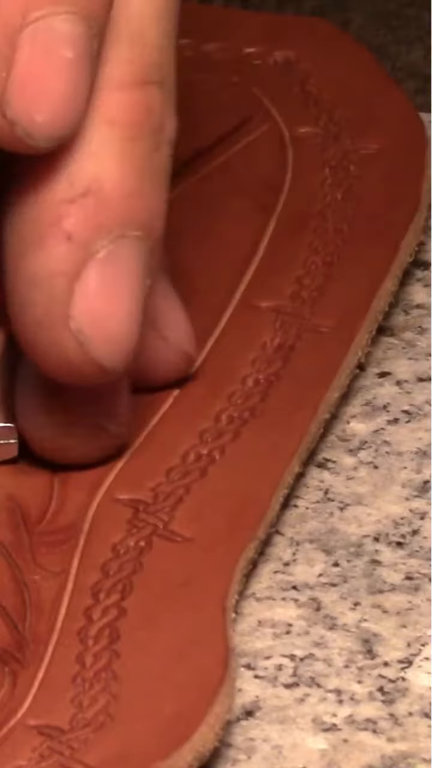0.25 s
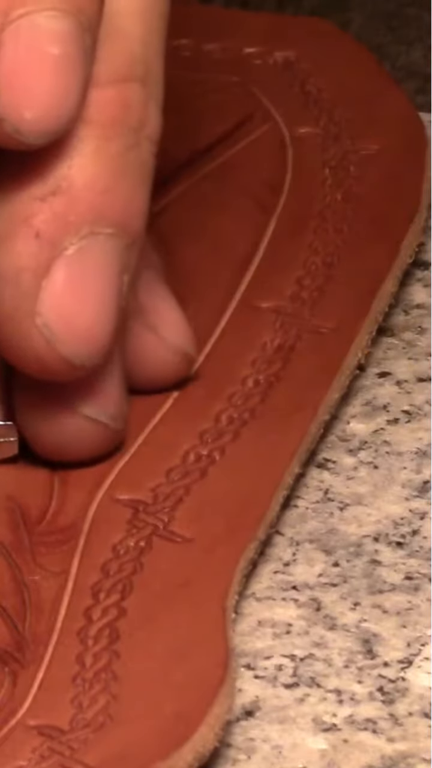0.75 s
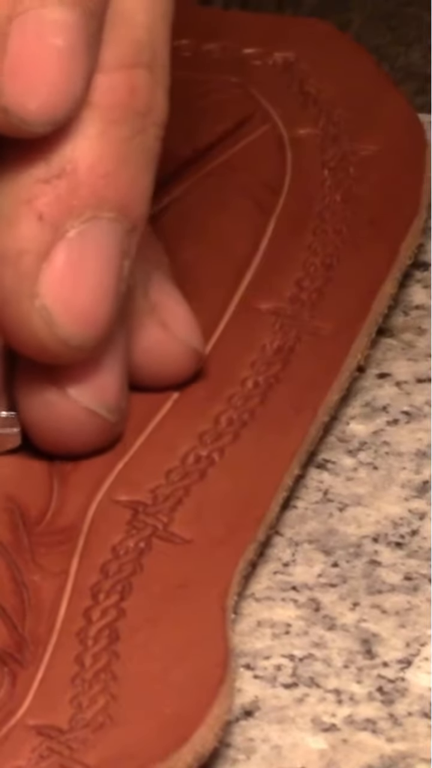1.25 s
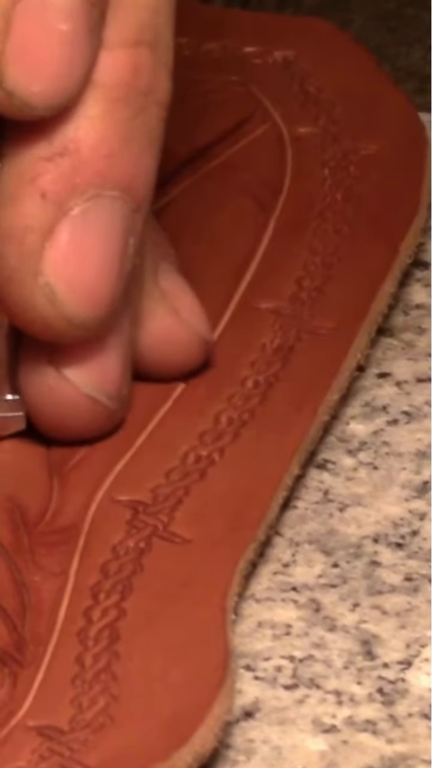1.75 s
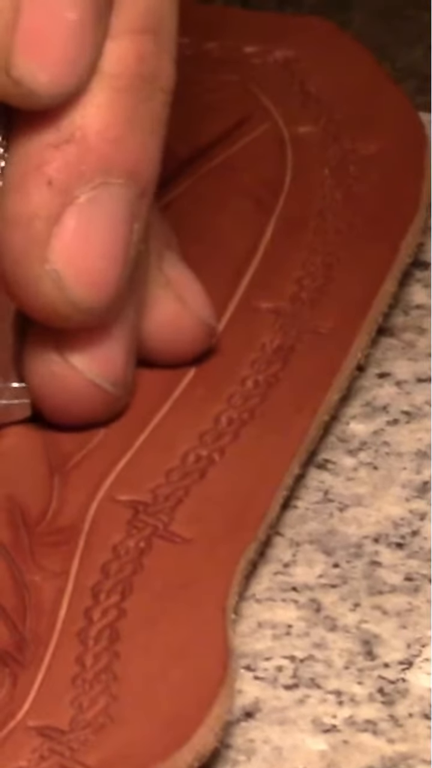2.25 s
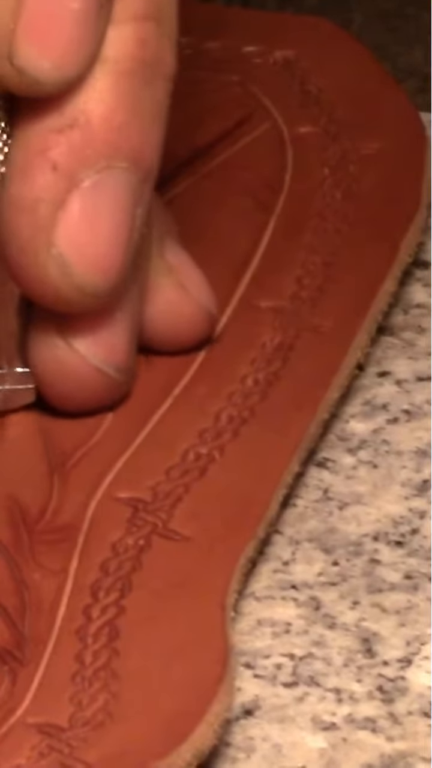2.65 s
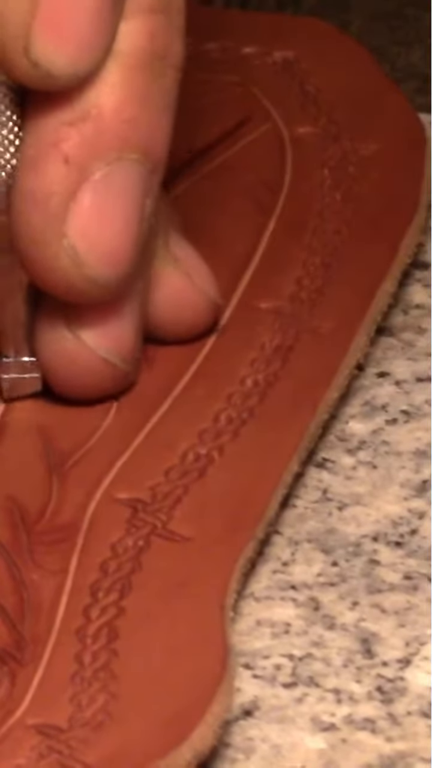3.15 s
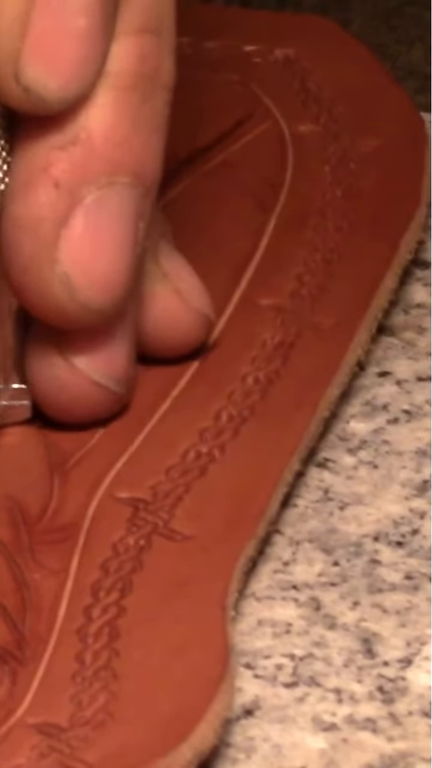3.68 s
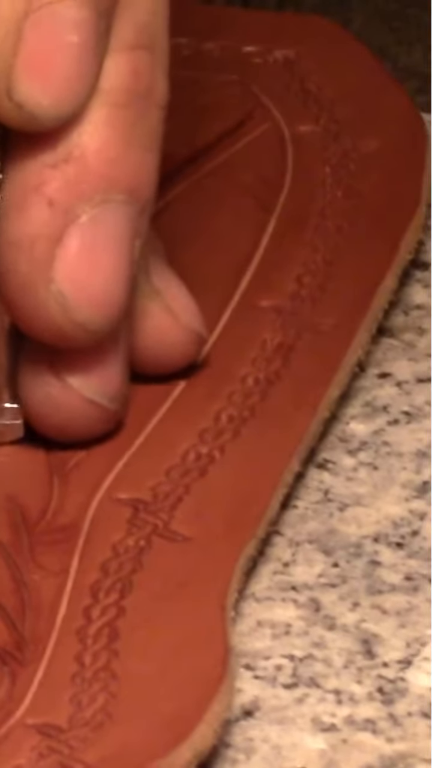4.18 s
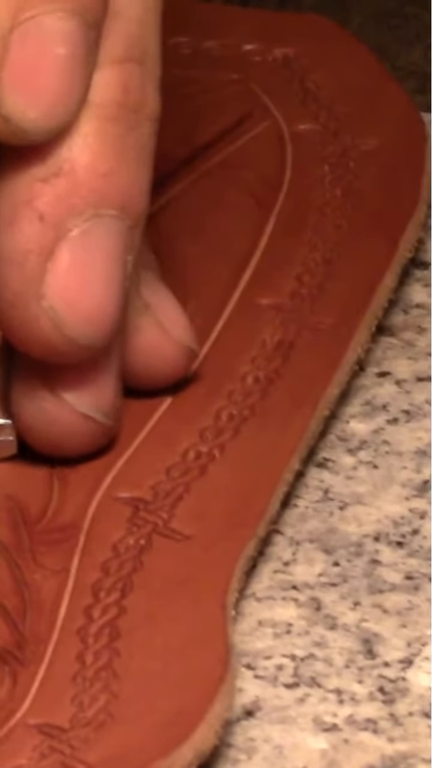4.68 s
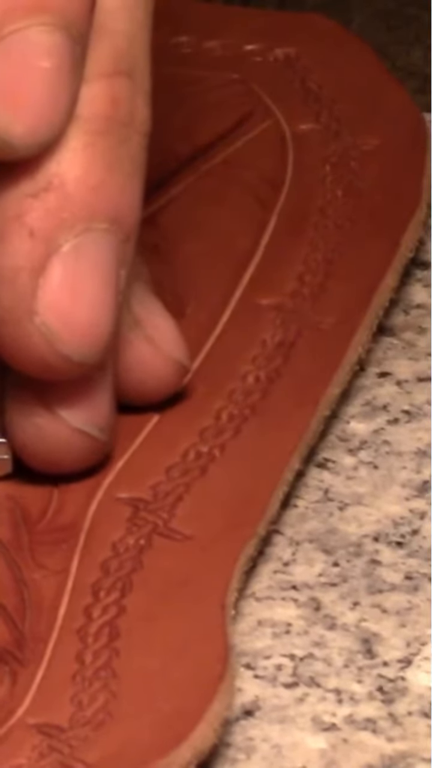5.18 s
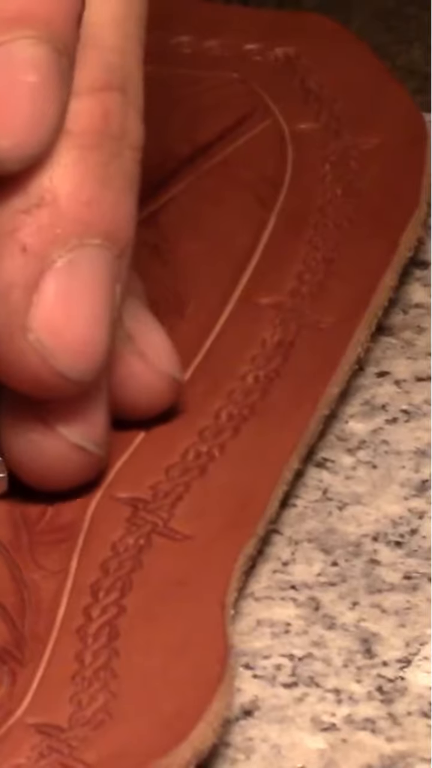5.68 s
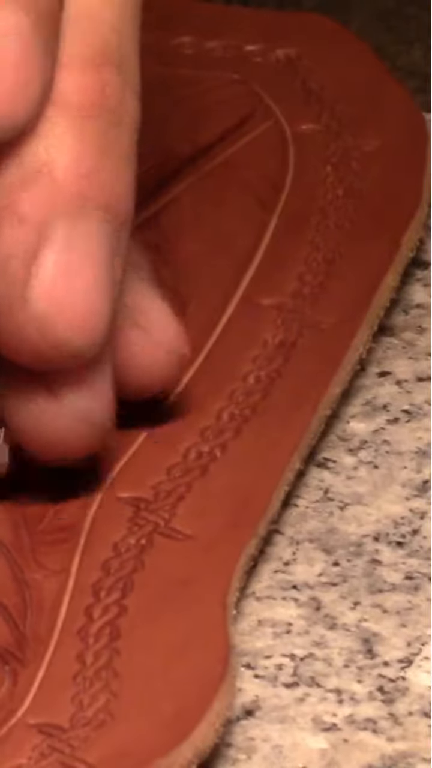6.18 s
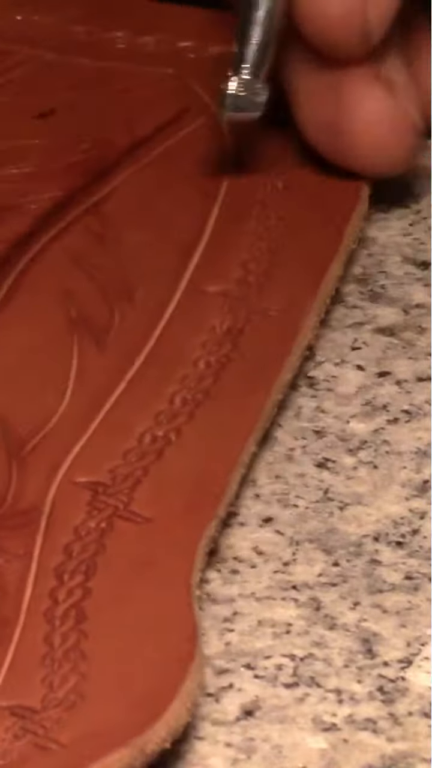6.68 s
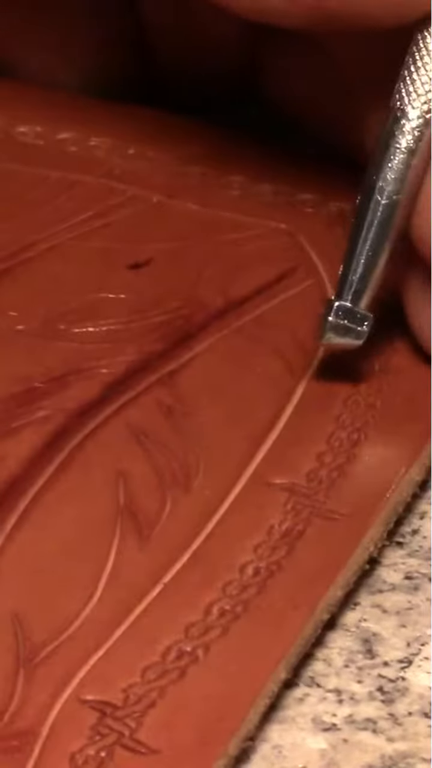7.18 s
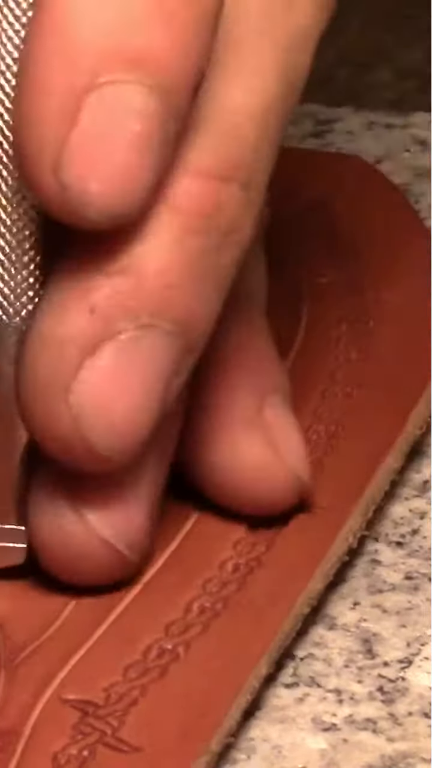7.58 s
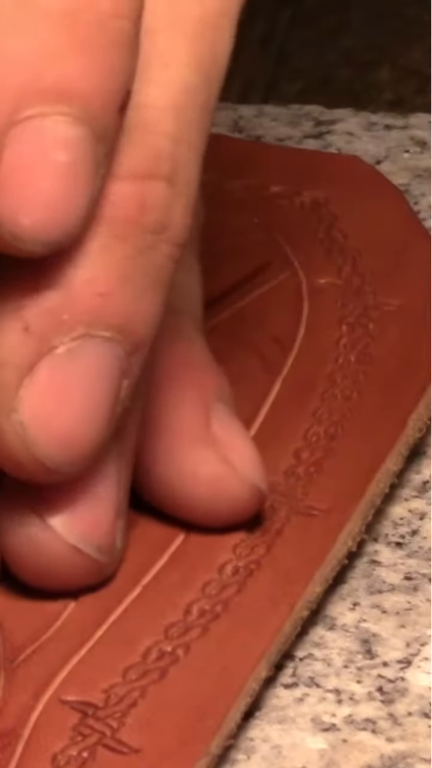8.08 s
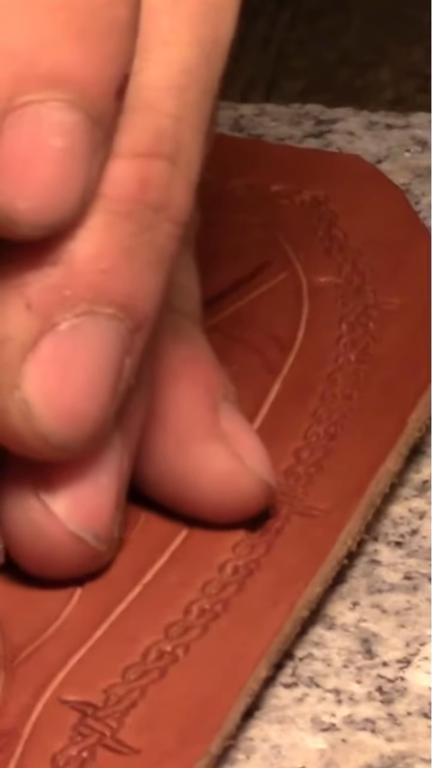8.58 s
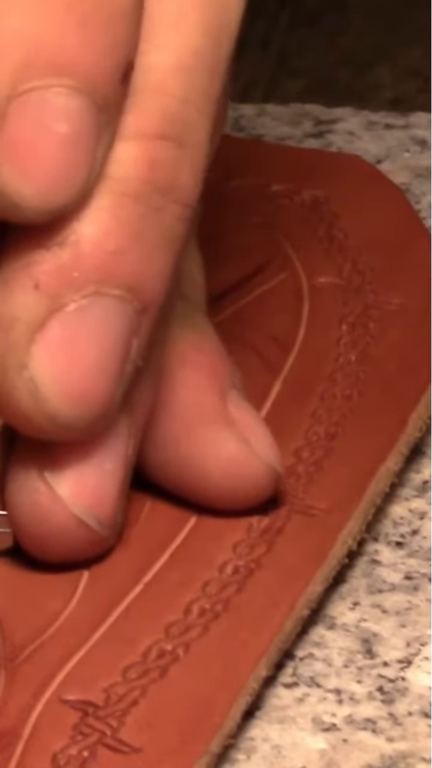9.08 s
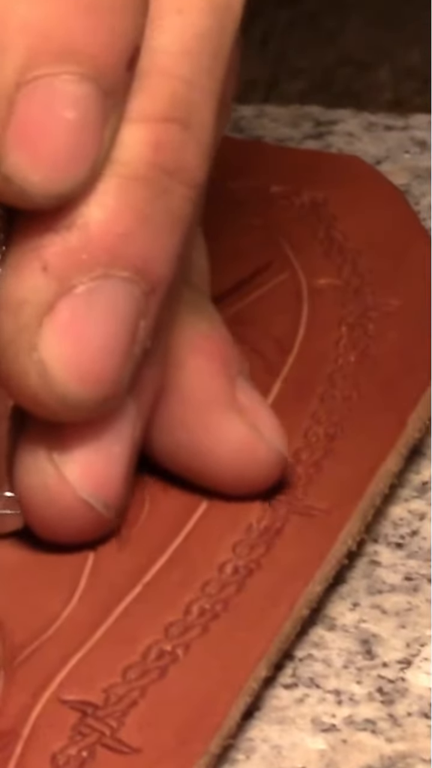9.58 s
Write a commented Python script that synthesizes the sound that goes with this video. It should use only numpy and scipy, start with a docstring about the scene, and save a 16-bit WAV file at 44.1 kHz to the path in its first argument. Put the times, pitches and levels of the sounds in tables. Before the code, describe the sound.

A small workshop heard very close and central, with short room reflections. A quiet fan, airy rush with a steady mid-low hum, runs from start to finish. It is alone until about 0.8 s, when a mallet starts tapping a steel stamp into leather on a stone slab. The first blows are uneven and lighter, then settle into a dense, regular rattle of about seventeen per second, each a bright, sharp, chattering metal click with a short dull thud of slab and bench. Strength varies slightly; a thin faint squeak slips in near 3.75 s. The taps weaken and stop around 6.2 s. In the pause, leather hisses faintly over stone, most clearly near 6.9 s, and the stamp ticks lightly at about 7.1 and 7.4 s. At 8.0 s a second run begins softer, grows firmer, and continues until the end near 9.8 s.

```python
"""A small workshop, heard through a close microphone: a fan hums from first to last.
A mallet soon starts tapping a steel stamp into leather on a stone slab, about 17 blows a second.
Each blow is a bright, chattering click of the stamp and a dull thud of slab and bench; one faint squeak
comes among them. In a pause the leather is slid round on the stone and the stamp ticks; a second run
of blows then lasts to the end. Coloured noise makes air and rubs, ringing modes make slab and bench."""
import sys
import numpy as np
from scipy import signal
from scipy.fft import rfft, irfft, next_fast_len
from scipy.io import wavfile
from scipy.ndimage import map_coordinates

SR = 44100
rng = np.random.default_rng(int(sys.argv[2]) if len(sys.argv) > 2 else 0)


def persist_wave(psi):
    """Save psi, clipped to +-1, as 16-bit WAV."""
    counts = np.round(np.clip(psi, -1, 1) * 32767).astype(np.int16)
    wavfile.write(sys.argv[1], SR, np.atleast_2d(counts).T)


N = 434385
SIZE = 16384  # samples in one response or one short sound
HZ = np.fft.rfftfreq(SIZE, 1 / SR)
T = np.arange(SIZE) / SR
USUAL_DB = -30  # strength of a usual blow


def amp(db):
    """Decibels to gain."""
    return 10 ** (np.asarray(db) / 20)


def unit(x):
    """Scale to rms 1."""
    return x / np.sqrt(np.mean(x ** 2) + 1e-20)


def along(points, hz):
    """Read (frequency [Hz], value) points on a log frequency axis."""
    f, v = np.transpose(points)
    return np.interp(np.log(hz + 1), np.log(f), v)


def filtered(x, response):
    """Multiply the spectrum of x by a response of frequency."""
    m = next_fast_len(N + SR // 2)
    spectrum = rfft(x, m) * response(np.fft.rfftfreq(m, 1 / SR))
    return irfft(spectrum, m)[..., :N]


def causal(points):
    """Minimum-phase response with the given (frequency [Hz], level [dB]) colour."""
    cepstrum = irfft(np.log(amp(along(points, HZ))))
    # fold the cepstrum onto positive time
    cepstrum[1:SIZE // 2] *= 2
    cepstrum[SIZE // 2 + 1:] = 0
    return np.exp(rfft(cepstrum))


def delay(ms):
    """Response of a pure delay: a phase that grows with frequency."""
    return np.exp(-2j * np.pi * HZ * ms / 1000)


def noise(points):
    """Noise of rms 1 with the given (frequency [Hz], level [dB per Hz]) colour."""
    return unit(filtered(rng.standard_normal(N), lambda hz: amp(along(points, hz))))


def wobble(rate):
    """A smooth random curve through `rate` random knots a second."""
    knots = rng.standard_normal(int(N * rate / SR) + 4)
    return map_coordinates(knots, [np.arange(N) * rate / SR])


def add(track, s, sound):
    """Mix a sound into a track at time s."""
    part = track[round(s * SR):][:len(sound)]
    part += sound[:len(part)]


# tones of the fan's blades and motor: (frequency [Hz], mean level [dB rms])
FAN_TONES = [(194, -90), (360, -73.5), (400, -76.5), (720, -62.5), (934, -88), (1080, -64), (1440, -74.5)]
# colour of the fan's rushing air: (frequency [Hz], relative level [dB per Hz])
AIR_COLOUR = [(25, -43), (100, -27), (280, -14), (450, -7), (700, 0), (1000, 0), (1250, -4), (1450, 0),
              (1850, -10), (2400, -13), (3000, -11), (3700, -16), (6200, -16), (16000, -31)]


def fan(air_db=-58.0, waver=0.6):
    """Rushing air under blade and motor tones whose level and phase (waver [rad]) drift slightly."""
    t = np.arange(N) / SR
    hum = np.zeros(N)
    for hz, db in FAN_TONES:
        level = amp(db + wobble(3.6)) * np.sqrt(2)  # rms to peak
        hum += level * np.sin(2 * np.pi * hz * t + waver * wobble(14))
    air = amp(air_db + 0.4 * wobble(5.1)) * noise(AIR_COLOUR)
    return hum + air


# reverberation of the workshop: (frequency [Hz], time to fall 60 dB [s])
ROOM_DECAY = [(300, 0.23), (1200, 0.11), (2500, 0.18), (5500, 0.084), (9000, 0.077), (16000, 0.083)]


def reverberation(start_ms):
    """Response of the diffuse room, of energy 1: noise that decays at its own rate in each band."""
    hz, t, z = signal.stft(rng.standard_normal(SIZE), SR, nperseg=128)
    decay = amp(-60 * t / along(ROOM_DECAY, hz)[:, None])
    tail = signal.istft(z * decay, SR, nperseg=128)[1][:SIZE]
    return rfft(tail / np.linalg.norm(tail)) * delay(start_ms)


def squeak(level_db=-47, middle_s=3.755, length_s=0.082, pitch_hz=1225, sag_hz_per_s=1300):
    """One thin squeak among the blows: a swelling and fading sine that slides slightly down."""
    t = np.arange(N) / SR - middle_s
    swell = np.exp(-(2 * t / length_s) ** 2)
    return amp(level_db) * swell * np.sin(2 * np.pi * (pitch_hz - sag_hz_per_s * t / 2) * t)


# strokes of leather and fingers over the stone: (middle time [s], length [s], level [dB])
RUB_STROKES = [(6.36, 0.17, -65.5), (6.66, 0.21, -65), (6.83, 0.14, -71), (6.917, 0.1, -52.5),
               (7.123, 0.092, -66), (7.335, 0.059, -61.5), (7.41, 0.052, -62)]
# colour of the leather's hiss: (frequency [Hz], relative level [dB per Hz])
LEATHER_COLOUR = [(1200, -33), (2500, -13), (3500, -3.5), (5000, -3), (9000, 0.5), (13000, -4.5),
                  (16000, -9)]


def slide(grain_db=2):
    """Leather hisses over the stone in short strokes, its level roughened as it catches slightly."""
    t = np.arange(N) / SR
    strokes = np.zeros(N)
    for middle_s, length_s, db in RUB_STROKES:
        strokes += amp(db) / (1 + (2 * (t - middle_s) / length_s) ** 8)
    hiss = unit(noise(LEATHER_COLOUR) * amp(grain_db * wobble(250)))
    return strokes * hiss


# stamp ticks as the fingers take a new grip: (time [s], level before level_db [dB], pitch [Hz])
GRIP_TICKS = [(7.0897, -33, 3630), (7.1485, -37, 5400), (7.432, -43, 2900)]


def ticks(level_db=-7, t60=0.013, snap_db=-5, low_cut_hz=400):
    """Light, finger-damped ticks of the stamp: narrow noise rings roughly, wide noise snaps."""
    track = np.zeros(N)
    for s, db, pitch_hz in GRIP_TICKS:
        resonance = 1 / (1 + ((HZ - pitch_hz) / 700) ** 2)
        ring = unit(irfft(rfft(rng.standard_normal(SIZE)) * resonance))
        snap = amp(snap_db) * rng.standard_normal(SIZE)
        add(track, s, amp(db + level_db - 60 * T / t60) * (ring + snap))
    return filtered(track, lambda hz: hz / (hz - 1j * low_cut_hz))


# mallet blows, in two runs: (time [s], strength [dB])
BLOWS = [(0.826, -56), (0.8906, -31.5), (0.9566, -33), (1.0239, -41), (1.0814, -39.5), (1.143, -31),
         (1.2098, -38.5), (1.265, -36), (1.3298, -29), (1.3944, -37.8), (1.4508, -34.7), (1.511, -33.0),
         (1.5733, -34.5), (1.6296, -33.5), (1.6889, -30), (1.749, -30), (1.8086, -30.5), (1.869, -32.0),
         (1.9292, -30.5), (1.9863, -29), (2.0455, -31.5), (2.1025, -27.5), (2.1592, -29.5), (2.2176, -30.5),
         (2.2766, -32.5), (2.3328, -30), (2.3916, -29), (2.4505, -29), (2.5075, -27.5), (2.5648, -28.5),
         (2.6201, -30.4), (2.678, -29.5), (2.735, -31.0), (2.7937, -31.5), (2.8523, -29), (2.9096, -31.5),
         (2.9699, -31.5), (3.0276, -32), (3.0842, -30.5), (3.1411, -33), (3.2005, -31.6), (3.2571, -32.5),
         (3.3151, -32), (3.3713, -27.5), (3.4278, -30.5), (3.4864, -32), (3.5451, -27.5), (3.6002, -27.0),
         (3.6564, -29.6), (3.714, -29.1), (3.7715, -29), (3.8284, -29), (3.886, -28), (3.9461, -29),
         (4.0045, -27.5), (4.0621, -27.7), (4.122, -27), (4.18, -29.9), (4.2373, -29), (4.2957, -27.8),
         (4.3532, -31.5), (4.4088, -30.5), (4.4666, -29), (4.5209, -30.5), (4.5791, -29.4), (4.6387, -28.5),
         (4.695, -30), (4.7536, -29.0), (4.8132, -31), (4.8703, -28.5), (4.9269, -28), (4.9847, -29.5),
         (5.0435, -29), (5.1021, -30.5), (5.1582, -30), (5.2153, -29.5), (5.274, -31.5), (5.3311, -29),
         (5.3905, -27.5), (5.447, -29.3), (5.5053, -30.5), (5.5617, -31), (5.6218, -31.4), (5.6778, -30.5),
         (5.7349, -34.2), (5.789, -31), (5.8467, -28.0), (5.9046, -30.5), (5.9625, -32.2), (6.02, -34.5),
         (6.0772, -33.6), (6.1357, -34), (6.1895, -39.8), (8.0334, -41), (8.1004, -36.5), (8.1643, -35.5),
         (8.2234, -35), (8.2826, -31), (8.3455, -29.5), (8.4058, -35), (8.4661, -36.7), (8.5222, -35.5),
         (8.58, -35), (8.6428, -34.2), (8.7008, -34.5), (8.7584, -33.5), (8.8167, -33.5), (8.876, -32),
         (8.9367, -31), (8.9955, -31.5), (9.053, -31.5), (9.1135, -29.5), (9.17, -31), (9.2285, -31.5),
         (9.2841, -30.9), (9.3428, -30.5), (9.4007, -31), (9.4588, -29.5), (9.5184, -29), (9.5757, -29),
         (9.6361, -29), (9.6942, -30.5), (9.7544, -30.5), (9.8128, -31.5)]
# modes of slab and bench: (frequency [Hz], level before the thud's colour [dB], time to fall 60 dB [s])
BENCH_MODES = [(307, -9.5, 0.066), (404.4, 10.5, 0.065), (486, 32.5, .01), (581.8, 15.5, 0.046),
               (666, 22.5, 0.028), (708, 4.5, 0.052), (793, 26.5, 0.0075), (884, -22, 0.068),
               (1015, -5, 0.044), (1116, -33.5, 0.2)]
# the thud's colour, with little below about 200 Hz: (frequency [Hz], gain [dB])
THUD_COLOUR = [(20, -30), (150, -39), (205, -10), (270, -5), (1150, 1.5), (1500, -2.5), (4000, -35)]


def thuds(level_db=0.5, lag_ms=0.94, swell_s=0.0065, room_db=-15, stray_db=-22, hardening=0.5):
    """The stamp pushes the slab down; slab and bench swing up over a few cycles and ring."""
    ring = np.zeros(SIZE)
    for hz, db, t60 in BENCH_MODES:
        ring += amp(db - 60 * T / t60) * np.sin(2 * np.pi * hz * T)
    swelling = ring * (1 - np.exp(-T / swell_s))
    push = -rfft(swelling) * causal(THUD_COLOUR) * delay(lag_ms)
    # the upper modes fill the room more than the low ones
    send = amp(along([(400, 0.5), (700, -2.5), (1200, 15.5)], HZ))
    room = amp(room_db) * reverberation(start_ms=8)
    octaves = np.log2(np.clip(HZ, 300, 1200) / 550)
    track = np.zeros(N)
    for s, db in BLOWS:
        # leather stiffens under a harder blow: a shorter push, stronger upper modes
        stiffness = amp(hardening * (db - USUAL_DB) * octaves)
        moving_arm = amp(stray_db) * reverberation(start_ms=3.05)
        thud = irfft(push * stiffness * (1 + send * (room + moving_arm)))
        add(track, s, amp(db + level_db) * thud)
    return track


def scatter(t60):
    """Response of a brief, dense scattering, of energy 1: a decaying burst of noise."""
    burst = rng.standard_normal(SIZE) * amp(-60 * T / t60)
    return rfft(burst / np.linalg.norm(burst))


REBOUND_MS, REBOUND_SPREAD = 0.3504, 0.054  # gap at the usual strength, its relative spread over blows
REBOUND_SHRINKS = 0.21  # exponent by which the gap shortens with force
KEPT = 0.18  # share of energy kept per rebound


def chatter(force_db, scatter_ms=0.018):
    """Mallet meets stamp four times in about a millisecond, ever weaker; hard blows rebound sooner."""
    contact = np.arange(4)
    usual_gap_ms = REBOUND_MS * amp(-REBOUND_SHRINKS * force_db)
    gap_ms = usual_gap_ms * np.exp(REBOUND_SPREAD * rng.standard_normal())
    sizes = np.sqrt(KEPT) ** contact
    times_ms = contact * gap_ms + scatter_ms * rng.standard_normal(len(contact))
    contacts = sum(size * delay(ms) for size, ms in zip(sizes, times_ms))
    return contacts / np.linalg.norm(sizes)


# colour of the steel stamp's click: (frequency [Hz], level [dB])
STAMP_COLOUR = [(600, -28), (1300, -18.5), (1750, -4), (2400, -8.5), (3300, -13), (4500, -15.5), (5300, -5),
                (6000, -0.5), (7000, -1.5), (8500, 1.5), (10200, -1.5), (12000, -7.5), (14000, -12.5),
                (16000, -24.5)]
# how the stamp sits in the leather as it is walked along; on softer leather it rings lower:
# (time [s], pitch ratio, click level [dB], brightness [dB per octave])
STAMP_SEAT = [(.85, 0.81, 2, 3.5), (1.3, 0.9, 4, 3), (1.9, 0.95, 1.25, -1), (2.55, 0.99, 1, -1),
              (3.05, 0.99, 3, -0.7), (3.6, 0.97, -1, -0.7), (3.75, .98, -2.5, -3), (5.4, 1.01, -1.65, -2.4),
              (6.2, 0.99, -2.5, -2.5), (8.05, 0.94, -0.5, -1), (8.45, 0.91, 0.8, -1), (8.8, 0.94, 1.7, 0),
              (9.3, 1.01, 1.3, -0.5), (9.8, 1.02, 2.5, 0)]
# what the stamp throws sideways into the room, against its direct sound: (frequency [Hz], level [dB])
SIDEWAYS_COLOUR = [(1500, -6), (3000, -1), (4500, 1.5), (5700, 1.5), (7000, -6), (10000, -8),
                   (16000, -11.5)]
# echoes from nearby surfaces: (delay behind the direct sound [ms], level [dB])
NEAR_ECHOES = [(2.599, -1), (3.2, -6), (8, -18)]
CLICK_GROWS = 0.66  # dB of click per dB of strength


def clicks(level_db=0.0, lead_ms=0.21, travel_ms=0.353, room_db=-4, stray_db=-8):
    """The steel stamp clicks under each blow: louder with strength, coloured by its seat in the leather."""
    # bending waves in the steel run faster at high pitch (travel_ms at 8 kHz): each contact is a tiny chirp
    bending = delay(2 * travel_ms * np.sqrt(8000 / (HZ + 1)))
    sideways = causal(SIDEWAYS_COLOUR)
    room = amp(room_db) * reverberation(start_ms=4.4)
    octaves = np.log2(np.clip(HZ, 3500, 14000) / 7000)
    seat_s, *seat = np.transpose(STAMP_SEAT)
    track = np.zeros(N)
    for s, strength_db in BLOWS:
        force_db = strength_db - USUAL_DB
        pitch, seat_db, brightness = (np.interp(s, seat_s, column) for column in seat)
        colour = causal([(hz * pitch, db) for hz, db in STAMP_COLOUR])
        steel = colour * bending * amp(brightness * octaves)
        # the moving hand and mallet scatter the echoes anew at each blow
        echoes = sum(amp(db) * delay(ms) * scatter(t60=0.0038) for ms, db in NEAR_ECHOES)
        moving_arm = amp(stray_db) * reverberation(start_ms=1.202)
        surroundings = sideways * (echoes + room + moving_arm)
        click = irfft(steel * chatter(force_db) * (1 + surroundings))
        gain = amp(level_db + seat_db + CLICK_GROWS * force_db)
        add(track, s - lead_ms / 1000, gain * click[:SIZE // 2])
    return track


def scene():
    """Everything sits close and central; a faint hiss and a little reverberation differ between the ears."""
    middle = fan() + squeak() + slide() + ticks() + thuds() + clicks()
    side = amp(-71.5) * noise([(30, 2), (1000, 8.5), (4000, 2.5), (16000, -11.5)])
    width = amp(along([(400, -44.0), (2000, -34.5), (12000, -24.5)], HZ))
    room = irfft(reverberation(start_ms=0.2) * width)
    spread = signal.fftconvolve(middle, room)[:N]
    ears = np.array([middle + side + spread, middle - side - spread])
    return ears * amp([[-0.1], [0.1]])  # the right ear is a touch louder


def record(dry):
    return filtered(dry, lambda hz: hz < 16600)


dry = scene()
out = record(dry)
persist_wave(out)
```